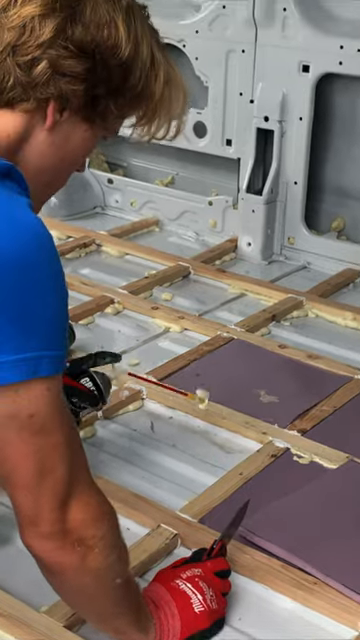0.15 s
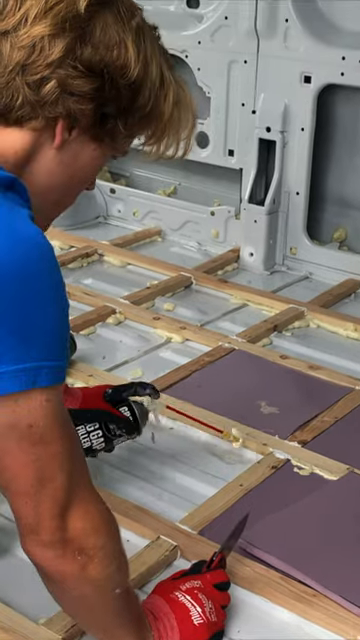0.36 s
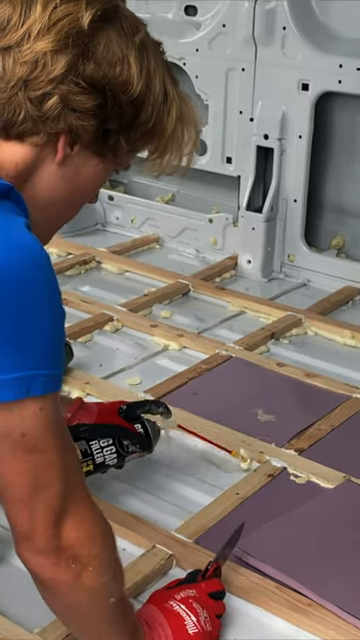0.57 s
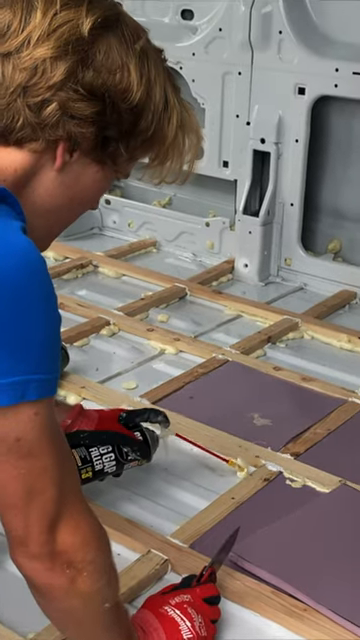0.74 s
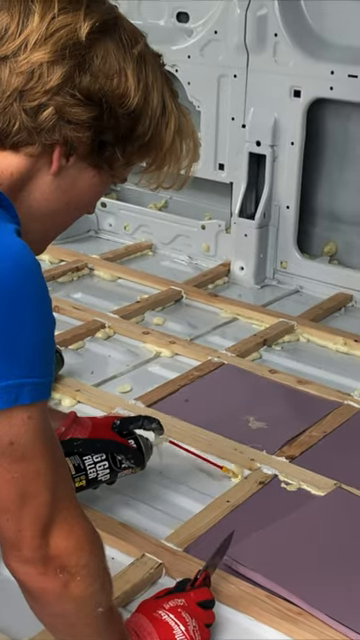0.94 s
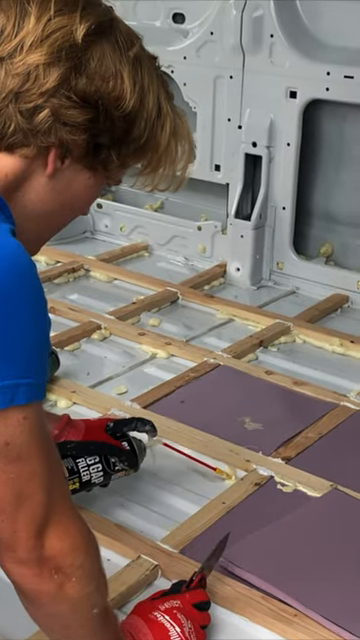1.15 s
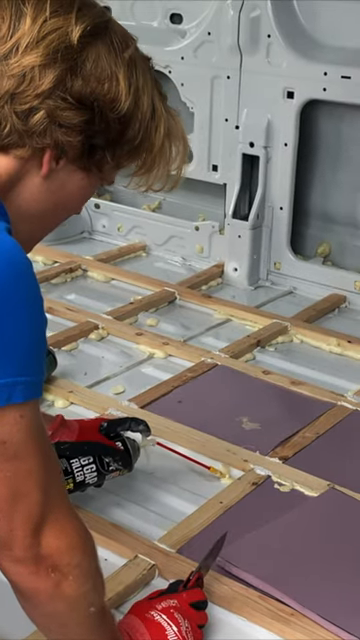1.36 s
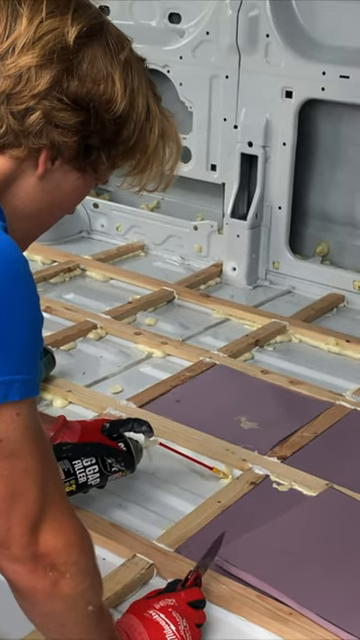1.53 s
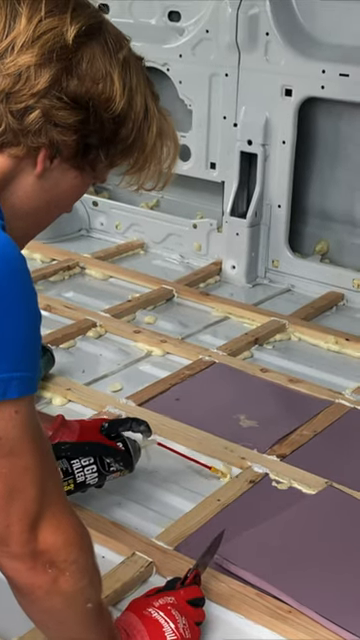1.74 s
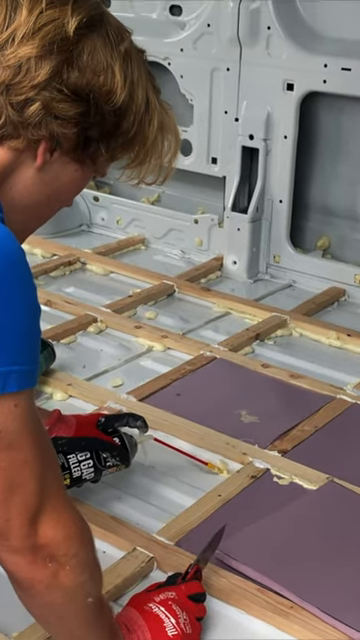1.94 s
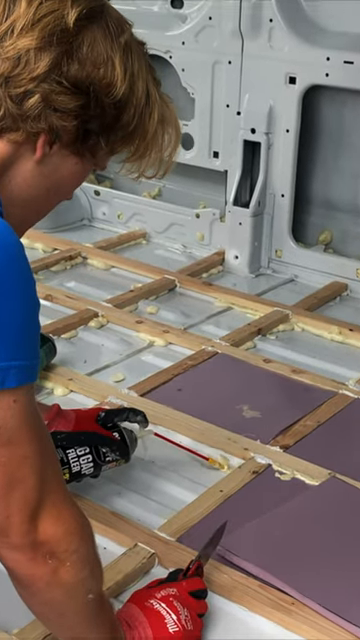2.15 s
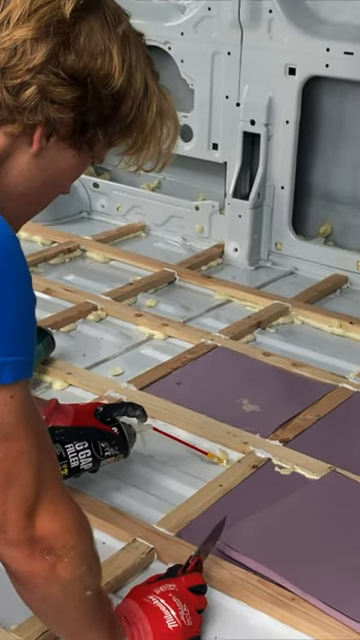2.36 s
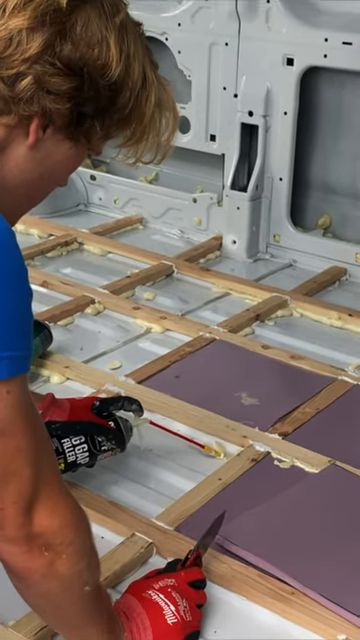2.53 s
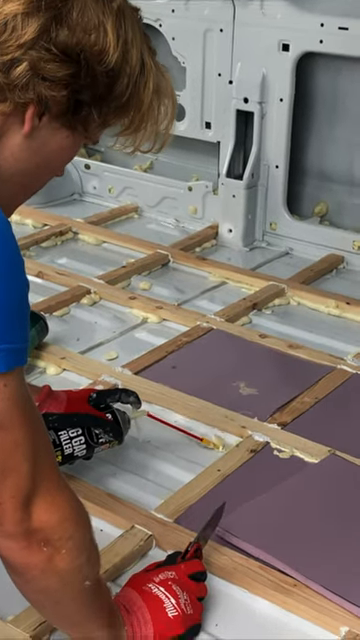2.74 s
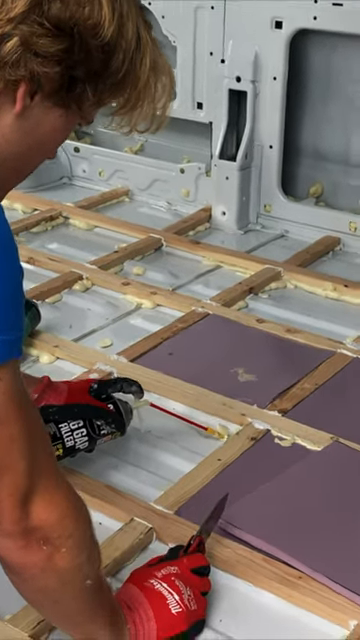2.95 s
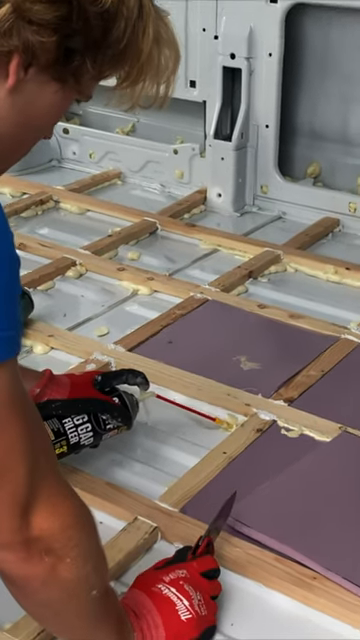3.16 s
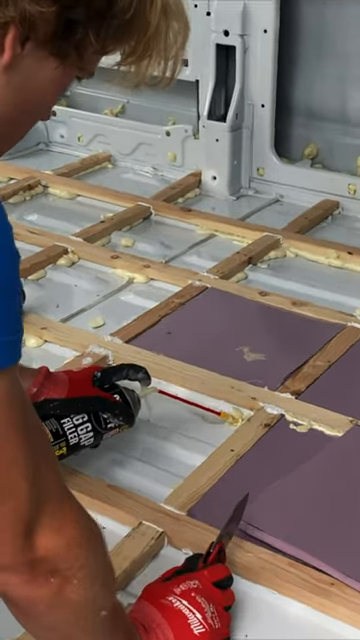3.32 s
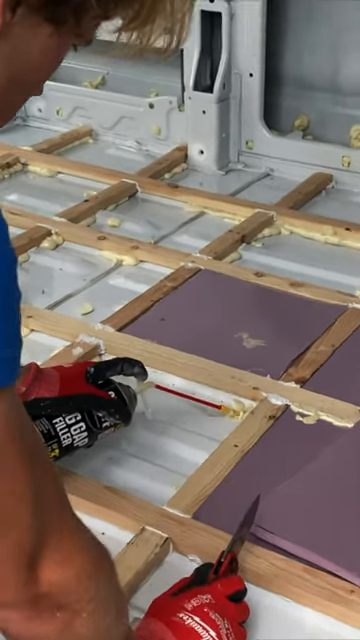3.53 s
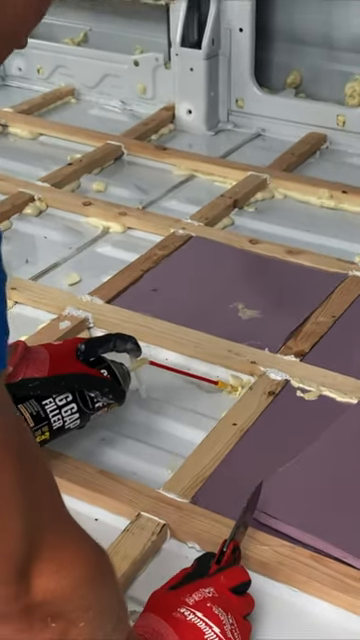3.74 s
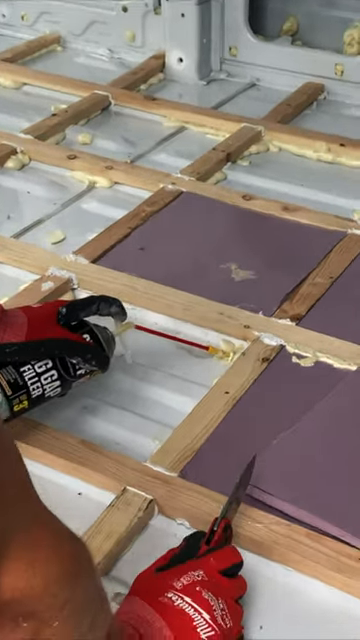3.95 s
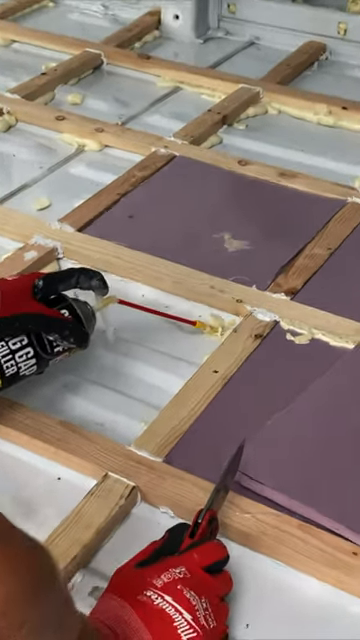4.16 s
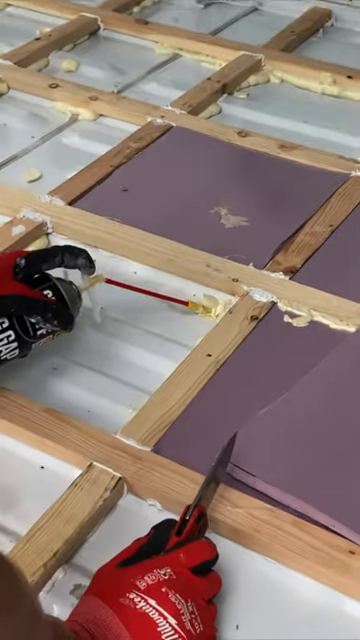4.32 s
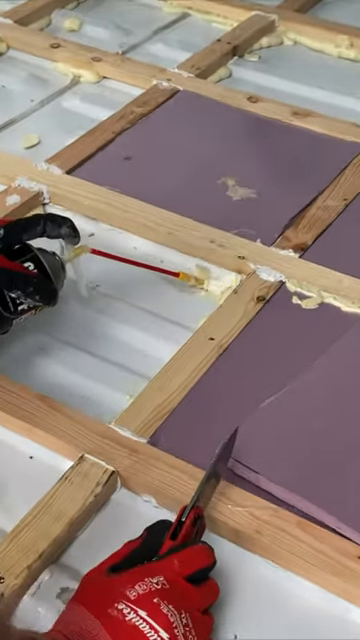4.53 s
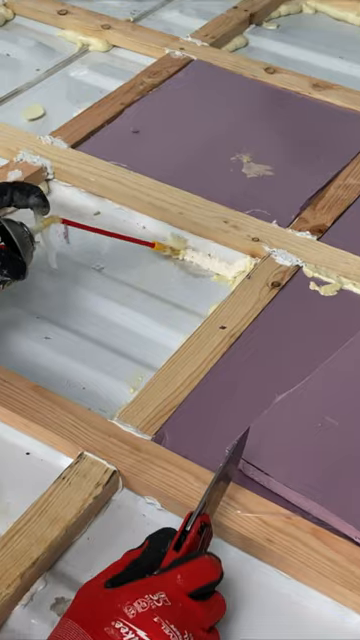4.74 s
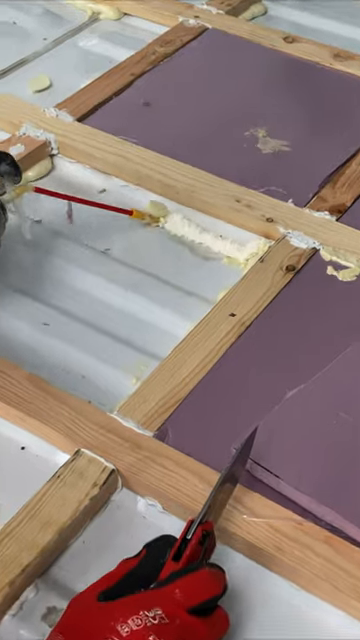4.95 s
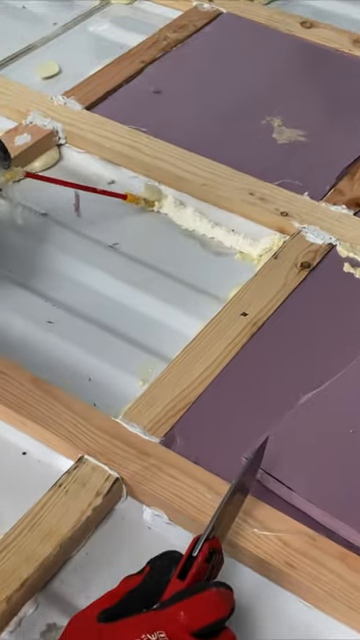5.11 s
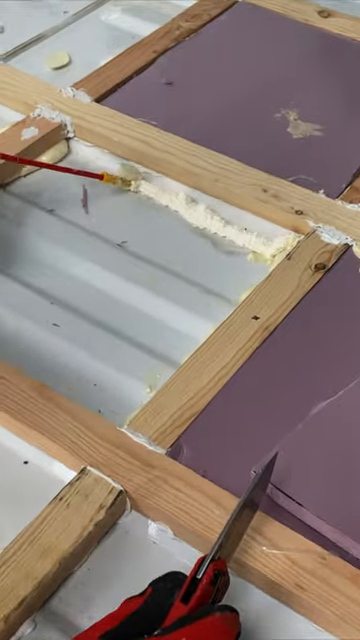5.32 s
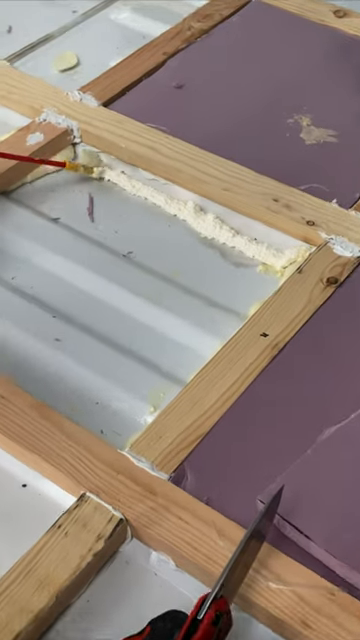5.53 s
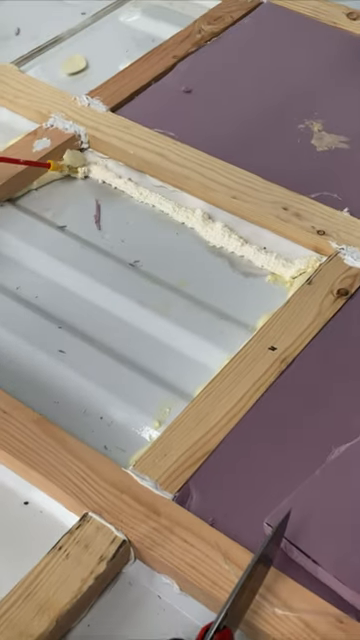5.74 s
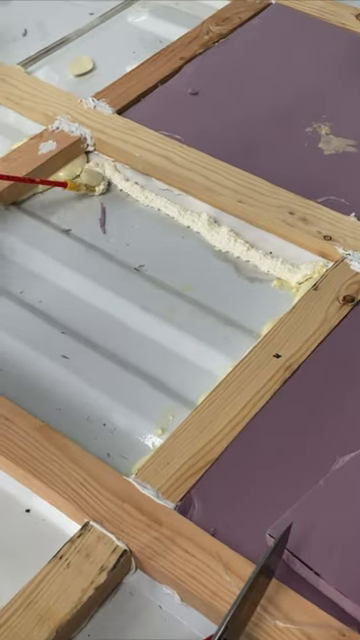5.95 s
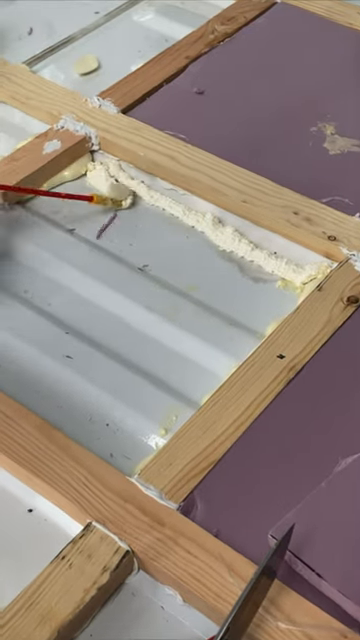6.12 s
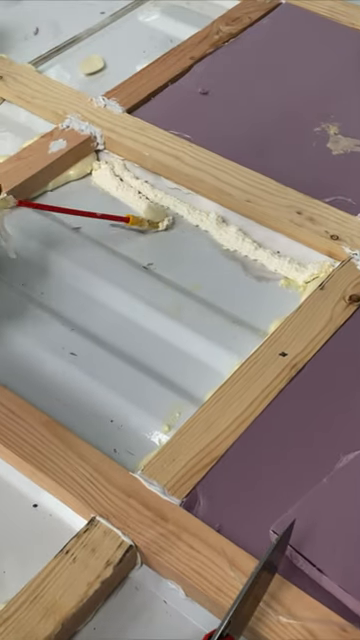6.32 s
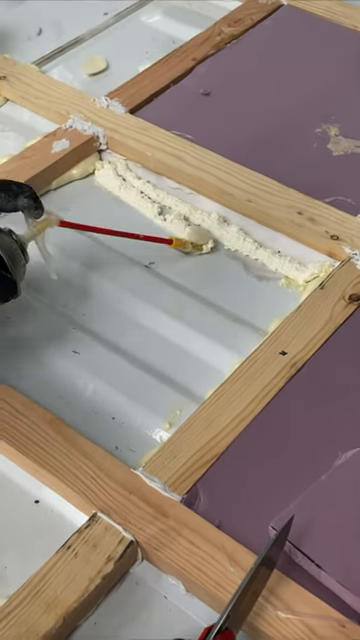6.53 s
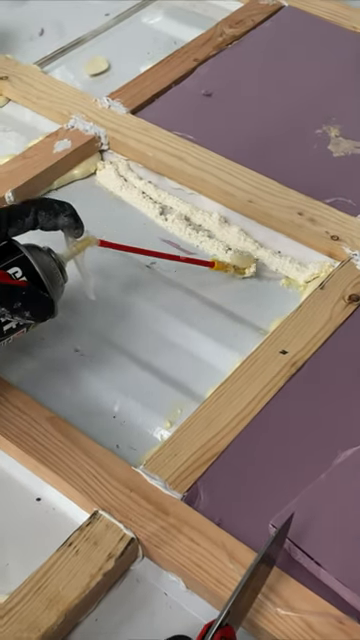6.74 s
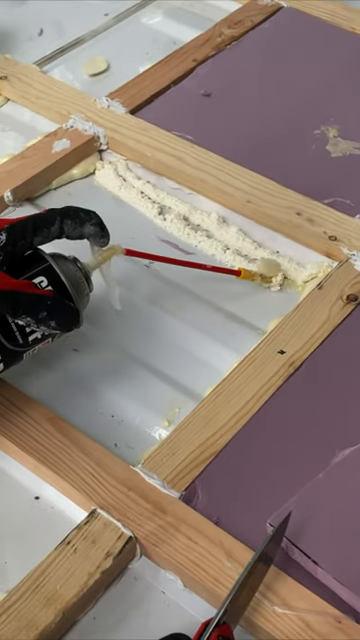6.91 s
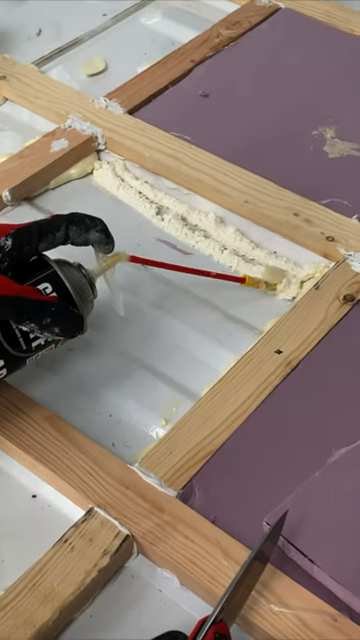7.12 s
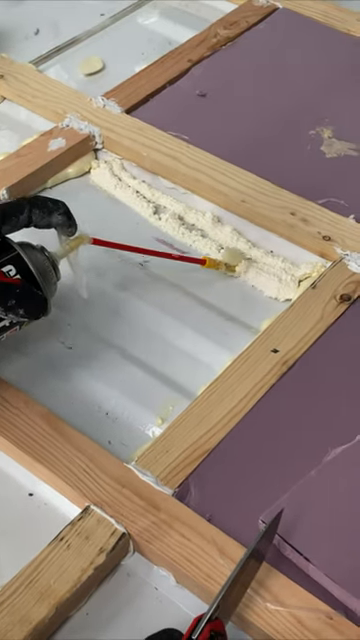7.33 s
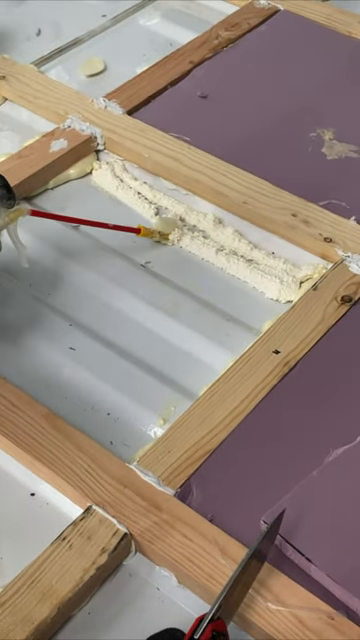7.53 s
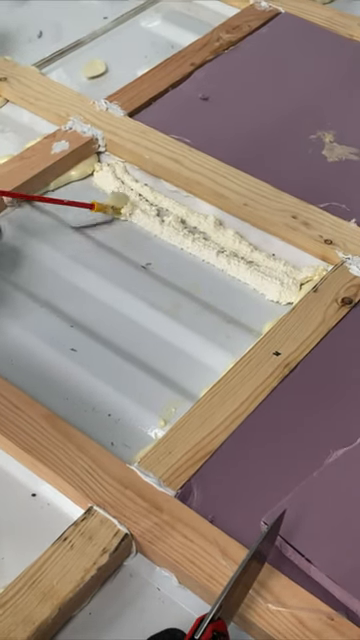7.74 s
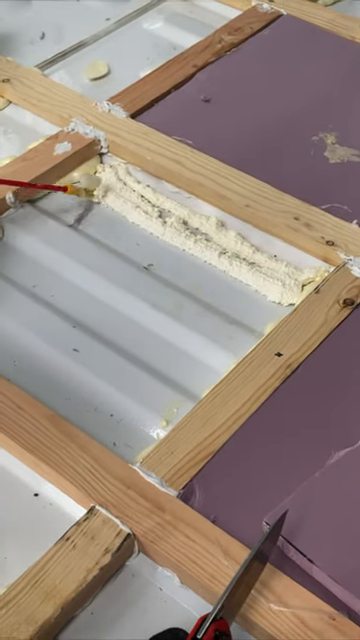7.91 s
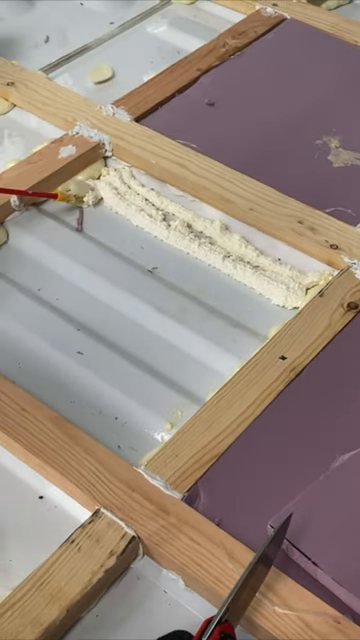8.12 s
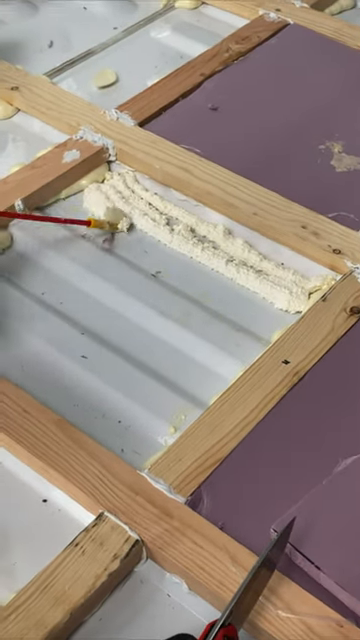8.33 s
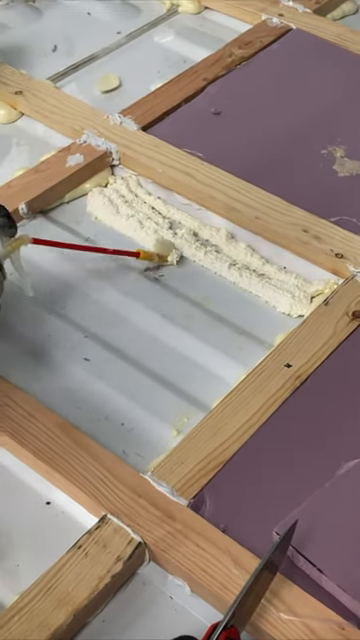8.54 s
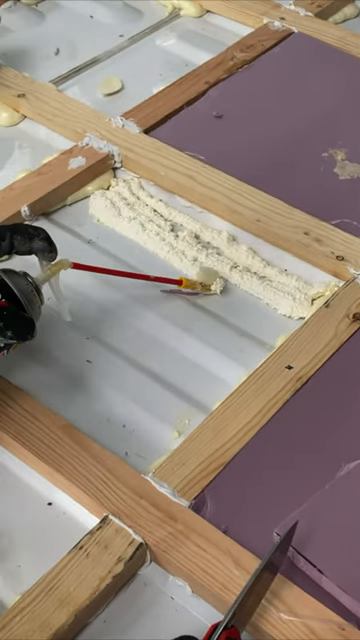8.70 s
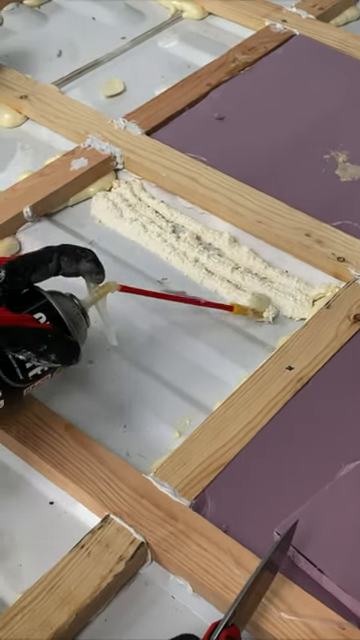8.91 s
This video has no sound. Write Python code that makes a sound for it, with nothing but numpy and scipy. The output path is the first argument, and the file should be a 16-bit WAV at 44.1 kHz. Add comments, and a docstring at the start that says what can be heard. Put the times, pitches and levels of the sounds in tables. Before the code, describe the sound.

Quiet yard with hoarse barks and birds, then aerosol foam starts thinly, spits in pops, and swells into a wet, crackling hiss.

```python
"""Foam can in an empty van

Expanding foam hisses, gurgles and sputters out of a thin straw: moving bands of noise, shaken and pinched,
with decaying pops for the slugs and shaky tones for the squeals. The straw moves about in an empty steel van,
close to a two-port microphone, so its echoes keep changing; a few knocks excite the modes of floor battens.
Outside, a dog barks in hoarse gliding partials and birds whistle, over filtered noise for rumble and wash."""
import sys
import numpy as np
from scipy import signal
from scipy.fft import rfft, irfft, next_fast_len
from scipy.io import wavfile
from scipy.ndimage import uniform_filter1d, map_coordinates

SR = 44100
rng = np.random.default_rng(int(sys.argv[2]) if len(sys.argv) > 2 else 0)


def ratio(d):
    """dB to gain"""
    e = np.asarray(d, float) / 20
    return 10 ** e


def output_pcm(signal):
    """Save a mono or channel-first signal as 16-bit PCM at the path in sys.argv[1].

    Samples are clipped to [-1, 1] before scaling.
    """
    pcm = np.clip(np.atleast_2d(signal).T, -1, 1) * 32767
    wavfile.write(sys.argv[1], SR, np.round(pcm).astype(np.int16))


N = 395577

# Levels in the tables are relative: each source is trimmed where it is mixed.
# share of liquid foam in the flow: [t/s, wetness 0-1]
WETNESS = [(.9, 0.37), (1.3, 0.53), (2.25, 0), (2.55, 0.85), (3.5, 0.72), (4.1, 0.91), (5.6, 0.88),
           (6.3, 0.88), (7.3, 0.85), (8.3, 0.86), (8.97, 0.92)]
# foam leaving the mouth: [t/s, gurgle level/dB, gurgle centre f/Hz]
FOAM = [(0.86, -80, 2110), (0.9, -63, 1660), (0.95, -38, 1820), (1.06, -69, 2060), (1.17, -37.5, 1080),
        (1.38, -51, 2180), (2.1, -49, 2000), (2.26, -42.5, 2090), (2.5, -44, 2050), (2.69, -37.5, 1970),
        (2.91, -56.5, 1950), (3.05, -51, 1990), (3.23, -64, 1120), (3.48, -90, 1430), (3.55, -55, 1080),
        (3.61, -74, 1540), (3.66, -48.5, 1820), (3.89, -47.5, 1620), (3.95, -47, 1900), (4.08, -40.5, 1900),
        (4.095, -36.5, 1980), (4.19, -28.5, 1950), (4.22, -31, 2000), (4.36, -26.5, 2200),
        (4.49, -26.5, 2180), (4.6, -29, 1650), (4.7, -33.5, 1570), (4.9, -25, 1900), (5.44, -31.5, 1490),
        (5.6, -26, 1830), (5.77, -24, 2000), (5.85, -25.5, 1950), (5.95, -27.5, 1550), (6.08, -28, 1520),
        (6.35, -36.5, 1590), (6.44, -32.5, 1700), (6.94, -37.5, 1150), (7.03, -38.5, 1390),
        (7.34, -35.5, 1330), (7.46, -34, 1620), (7.66, -36, 1420), (7.75, -28.5, 1580), (7.79, -34, 1290),
        (8.18, -35.5, 1720), (8.29, -32.5, 1020), (8.45, -41.5, 1600), (8.95, -40.5, 1560),
        (8.97, -44, 1720)]
# gas escaping past it: [t/s, low whistle level/dB, high whistle over low/dB, fizz over low/dB]
GAS = [(0.86, -64, -6, -9), (0.95, -42.5, -2, -0.5), (1.27, -49, 2.5, 1), (1.72, -36.5, 2, 5),
       (1.9, -39.5, 4, 2), (2.16, -35, 7.5, 3), (2.2, -38, 6.5, 2.5), (2.28, -37, 4, 1.5),
       (2.71, -36, 0.5, -13), (2.87, -45, 0, -10.5), (3.03, -40.5, 2.5, -7), (3.3, -57.5, -3.5, -6),
       (3.77, -49.5, 5.5, 9), (4.07, -55, -10, -3), (4.14, -55.5, -6, 13), (4.19, -36, 4, 6.5),
       (4.215, -51, 9, 14), (4.23, -36, 6.5, 0.5), (4.34, -32.5, -1, -15), (4.41, -32, -3.5, -16),
       (4.49, -30.5, 0, -10), (4.58, -42.5, 3, -25), (4.64, -39, -7, 5.5), (4.69, -43.5, 4, -9),
       (4.9, -29, -1, -4.5), (5.31, -28.5, 0, -10), (5.42, -32.5, -3, -10), (5.47, -33, 9.5, 0.5),
       (5.6, -28.5, 0.5, -2.5), (5.74, -25, 1.5, -7.5), (5.83, -34, -1.5, -10), (5.89, -28.5, -14, -27),
       (5.94, -29.5, -21, -25), (6.05, -28, 5.5, -7.5), (6.12, -23.5, -3.5, -22), (6.14, -27, 4, -12),
       (6.35, -31.5, 0, -22), (6.42, -39, -12, -14), (6.48, -31, -16, -7), (6.55, -29.5, -13.5, -21.5),
       (6.69, -35, -9, -18), (6.87, -39.5, -8, -11.5), (6.95, -36.5, -1, -20), (7.02, -41, -22, -18.5),
       (7.2, -54, -13, -12), (7.25, -43, -3.5, -13), (7.36, -39.5, -1, -3), (7.41, -32.5, 1, -7),
       (7.84, -28.5, -0.5, -9.5), (7.91, -25, -6, -17), (8.02, -39, 7.5, 4.5), (8.09, -35.5, -13, -12),
       (8.16, -58, 0, -9), (8.27, -42, 3.5, -8), (8.31, -26.5, 3, -11.5), (8.45, -32, 8.5, -9),
       (8.81, -36, -6.5, -7.5), (8.9, -33, -5.5, -18), (8.97, -43, -2, -8)]
# the rasp between gurgle and whistles: [t/s, level/dB, centre f/Hz]
RASP = [(0.86, -73, 2480), (0.9, -39, 2550), (0.95, -36, 2920), (1.04, -40, 3170), (1.15, -44.5, 2780),
        (1.24, -41, 3230), (2.26, -40.5, 3200), (2.71, -49.5, 3420), (2.87, -66, 3050), (3.03, -48.5, 3180),
        (3.34, -59, 2920), (3.77, -48.5, 2820), (4.07, -51, 2550), (4.25, -34, 3000), (4.5, -29, 3100),
        (4.61, -39, 2700), (4.77, -31.5, 2830), (5.02, -25.5, 2660), (5.35, -32.5, 2850), (5.72, -28, 2770),
        (5.76, -26.5, 3270), (6.01, -34.5, 3000), (6.14, -33, 3630), (6.46, -44, 3500), (6.55, -40, 3730),
        (6.8, -32.5, 3900), (6.96, -37.5, 3300), (7.25, -51.5, 2900), (7.34, -45, 3120),
        (7.59, -39.5, 2680), (7.66, -27.5, 3140), (7.88, -46, 3230), (8.02, -26.5, 3030), (8.2, -46, 2710),
        (8.29, -42, 3300), (8.36, -35.5, 3080), (8.45, -39.5, 2640), (8.61, -50, 3580), (8.7, -43, 2970),
        (8.83, -37, 3200), (8.97, -43.5, 2870)]
# colour of the gurgle before its resonances: [f/Hz, level/dB]
GURGLE = [(250, -52), (550, 8.5), (750, 0), (1500, -10.5), (2300, -9), (2800, -40), (3600, -35),
          (6000, -54)]
# fixed resonances around the low whistle, one broad and one narrow: [f/Hz, width/Hz, level/dB]
LOW_WHISTLE = [(4350, 4900, -9), (5790, 290, -4.5)]
# pitch of the low whistle: [t/s, f/Hz]
LOW_PITCH = [(0.9, 4220), (1.6, 4920), (2.2, 4520), (2.5, 4920), (2.79, 4660), (2.9, 5500), (3.52, 4200),
             (3.56, 5800), (3.68, 5900), (3.76, 3980), (3.9, 3800), (4.1, 4930), (4.47, 4270), (4.85, 5170),
             (5.39, 4700), (5.6, 5100), (5.89, 4730), (6.15, 4700), (6.5, 5150), (6.88, 5010), (6.97, 4370),
             (7.96, 5130), (8.56, 4760), (8.72, 5280), (8.97, 4300)]
# pitch of the high whistle: [t/s, f/Hz]
HIGH_PITCH = [(0.9, 6800), (1.17, 7240), (1.42, 6530), (1.62, 7000), (2.2, 7100), (2.88, 7100),
              (2.94, 6260), (3.03, 7400), (3.39, 6600), (3.6, 8100), (3.87, 6950), (4.09, 7400),
              (4.2, 7000), (4.72, 6900), (4.76, 7600), (5.28, 6770), (5.57, 7130), (5.62, 6760),
              (6.41, 6600), (6.45, 7160), (6.99, 6860), (8.47, 6790), (8.97, 6700)]
# colour of the fizz: [f/Hz, level/dB]
FIZZ = [(5000, -39), (7500, 4.5), (8500, 8), (10300, -2), (11500, -11.5), (12500, -20), (13500, -60),
        (15000, 1), (16000, -53)]
# shallow dips in the straw's sound: [f/Hz, width/Hz, share lost]
DIPS = [(2650, 470, 0.24), (3685, 330, 0.21)]
# thick foam throttles the flow, which bursts free; negative depth swells it:
# [release t/s, depth/dB, closing time constant/s]
PINCHES = [(4.209, 22, 0.011), (4.279, -2, 0.011), (4.348, -1.5, 0.0093), (4.527, 13, 0.0088),
           (4.569, 1, 0.016), (4.621, 14, 0.031), (4.666, 6.5, 0.029), (4.727, -1, 0.013),
           (5.207, 8.5, 0.024), (5.262, 15, 0.0081), (5.305, 1.5, 0.011), (5.882, -1.5, 0.007),
           (5.957, 18, 0.002), (6.216, 7, 0.0082), (6.271, 10, 0.0097), (6.839, 5, 0.093),
           (8.393, -0.5, 0.0091), (8.521, 2, 0.004)]
# the mouth flaps open and shut: [first swell t/s, last swell t/s, swells per s, depth/dB]
FLUTTERS = [(6.455, 6.685, 31.5, 6), (6.927, 6.953, 45, 11), (5.312, 5.373, 37, 3), (6.11, 6.155, 42.3, 5),
            (8.428, 8.5, 31, 7.5), (8.597, 8.632, 31, 6.5)]
# squeals of gas through a gap in the foam: [start t/s, length/s, f/Hz, level/dB]
SQUEALS = [(0.929, .014, 2844, -35.5), (0.951, 0.013, 2900, -40), (3.554, 0.0097, 5800, -41),
           (3.803, 0.046, 6770, -43), (4.098, 0.0098, 4900, -44), (3.175, 0.021, 7000, -43),
           (3.218, 0.0098, 7000, -40.5), (5.208, 0.038, 5860, -33), (6.744, 0.049, 5200, -48),
           (6.837, 0.023, 5220, -32), (6.926, 0.015, 5820, -24.5)]
# the clearest slugs of foam clearing the straw: [t/s, level/dB, hiss against pop/dB, pop f/Hz]
SPURTS = [(0.934, -26.5, -4.5, 1350), (0.959, -31, -14.5, 1190), (1.033, -43, 6, 2030),
          (1.36, -34, 2, 2130), (2.297, -20.5, 3, 1900), (2.466, -23.5, 2, 1970), (2.526, -26, -13, 1940),
          (3.21, -21.5, -26, 970), (3.223, -35, -6, 1090), (3.37, -33.5, 2, 1210), (3.54, -21, -5, 1080),
          (3.656, -25.5, -13, 1980), (3.733, -26.5, -1, 2020), (3.757, -28.5, 0, 980),
          (3.818, -28.5, -7, 2140), (3.859, -29.5, 3, 1870), (3.991, -24, -24, 1900),
          (4.008, -27, -17, 1900), (4.066, -47, 8, 1890), (4.09, -26, -6, 2000), (4.123, -28, -15, 1900),
          (4.182, -42, 9, 1950), (4.21, -28.5, 7.5, 2100), (4.278, -28, 6, 2020), (4.354, -19, -6, 2130),
          (4.529, -19, 0.5, 1450), (4.571, -18, -5, 1980), (4.622, -21.5, -9, 2120),
          (4.675, -19.5, 0, 2000), (4.728, -17, 0.5, 1350), (4.76, -18, 1, 2000), (4.782, -18, -5, 1970),
          (4.824, -17.5, -0.5, 1900), (4.853, -18, -22, 1740), (5.208, -18, -8, 2470),
          (5.27, -28, 10, 1810), (5.936, -15, -22, 1550), (6.083, -15.5, -14, 1420),
          (6.219, -20.5, 4.5, 1450), (6.577, -22, -9, 1490), (6.64, -22.5, -2, 1630),
          (7.209, -30, -25, 1260), (7.224, -20.5, -18, 1270), (7.232, -27, -20, 1330),
          (7.241, -23, -17, 1500), (7.323, -23, -12, 1417), (7.4, -32, 12, 1190), (7.768, -28, 19.5, 1050),
          (8.246, -24, -19, 1140), (8.397, -25, 18, 1030), (8.524, -34, 19.5, 1544)]
# blows on the battens: [t/s, level/dB, crack against thud/dB, hardness of contact f/Hz]
KNOCKS = [(0.083, -28.5, 2.5, 1480), (4.794, -27, -16, 700), (4.909, -30.5, 0, 1810),
          (5.488, -27.5, -5, 170)]
# modes of a batten: [f/Hz, width/Hz, level/dB]
BATTEN = [(175, 160, -8), (403, 85, 5.5), (690, 370, 0.5), (1350, 160, -3.5)]
# where the straw is heard: [t/s, left over right level/dB]
PLACE = [(0.0, 11.5), (0.1, 3), (0.22, 8), (0.27, 2), (0.62, 1), (2.05, 1), (6.12, 2.5), (6.75, 0),
         (8.09, 2.5), (8.97, 1)]
# the housing turns the phase between the ports: [f/Hz, right leads left by/rad]
PORT_PHASE = [(300, 0), (1000, .7), (2000, -.3), (2700, 0), (3500, -3), (3900, -2.9), (4400, -1.1),
              (5700, 1.9), (6200, 1.8), (7000, -1), (7500, -1.3), (7900, -3.6), (8600, -3.1), (9600, -1.8),
              (10600, 0), (11700, 0), (12500, 2.3)]
# echo decay in the van: [f/Hz, t60/s]
VAN = [(300, 0.12), (2000, 0.11), (7000, 0.046), (10000, 0.014)]
# [start t/s, rise/s, level/dB, lower partial f/Hz, upper partial f/Hz, upper over lower/dB,
#  hoarseness: scale of phase shake/rad]
BARKS = [(-.03, 0.025, -42, 497, 803, 3.5, 1.1), (.2, 0.081, -32, 521.4, 801, 5, 0.71),
         (1.071, 0.1, -26, 597, 845, -3, 1.2)]
# whistled notes: [start t/s, hold/s, fade/s, f/Hz, glide/(Hz/s), level/dB, scale of phase shake/rad]
BIRDS = [(-.02, 0.14, 0.29, 3090, -400, -52, 2.6), (0.132, .08, 0.025, 2272, -150, -45.5, 0.35),
         (0.48, 0.097, 0.36, 2784, 66, -49, 1.18), (0.528, 0.018, 0.023, 2650, -14000, -46, .15),
         (0.872, 0.076, 0.015, 2394, 1900, -44.5, 0.091), (0.919, .18, 0.1, 2530, 393, -48.5, 0.17),
         (0.034, 0.031, 0.025, 3350, -6000, -40.5, 0.48), (0.617, 0.05, 0.03, 4780, 10, -74, 0.34),
         (0.708, 0.056, 0.084, 4700, -500, -71, 1.5)]
# echo decay in the yard: [f/Hz, t60/s]
YARD = [(400, 0.54), (2300, 0.34), (3300, 0.25), (8000, 0.17)]
# colour of the far rumble: [f/Hz, level/dB]
RUMBLE = [(15, -31), (40, -0.5), (100, 2.5), (160, 6.5), (300, -29.5)]
# rumble over time: [t/s, level/dB]
RUMBLE_LEVEL = [(0, -65.5), (1.2, -62), (2.8, -60), (3.9, -59.5), (4.4, -70.5), (6.4, -72.5), (7.4, -60.5),
                (8.97, -65)]
# colour of the wash from outside: [f/Hz, level/dB]
AIR = [(60, -45), (120, -13), (200, -3), (300, 0), (600, -2.5), (1000, 1.5), (2000, -11), (3300, -11),
       (3900, -20), (7000, -30), (10000, -57), (14000, -83)]
# wash over time: [t/s, level/dB]
AIR_LEVEL = [(0.0, -60.5), (0.82, -71), (1.2, -55.5), (1.57, -68), (2.65, -65), (4.77, -58), (5.4, -69),
             (5.67, -56.5), (8.97, -56)]
# how alike rumble and wash are at the two ports: [f/Hz, left-right likeness]
AIR_ALIKE = [(60, 0.93), (300, 0.8), (800, 0.1), (3000, 0.077)]

VALVE_S, OPENING_S = 0.885, 0.025  # the trigger is pressed; the flow fades in
# small gas pockets: average rate, decay time constant, relative size
SPUTTERS_PER_S, SPUTTER_S, SPUTTER_SIZE = 90, 0.0027, 0.38
RELEASE_S = 0.00051  # time constant of reopening after a pinch
FLUTTER_LIFT = 0.6  # share of the depth by which the swells rise above the steady flow
# lesser slugs: candidates per s (thinned in dry flow), offset from gurgle, scatter, hiss against pop
SPITS_PER_S, SPIT_DB, SPIT_SCATTER_DB, SPIT_HISS_DB = 5, 4, 2, -12
PUFF_T60_S, PUFF_LONGER = 0.053, 0.94  # t60 at 1.6 kHz; power by which it grows with the pop's pitch
# bark swell, speed of fall, depth of fade; the pitch starts this share low
BARK_RISE_DB, BARK_FALL_DB_PER_S, BARK_FADE_DB, BARK_SAG = 22, 122, 48, 0.0436
NOTE_RISE_S, NOTE_RISE_DB, NOTE_FADE_DB = 0.018, 13, 27.5


def unit(x):
    """x at rms 1."""
    return x / np.sqrt(np.mean(x ** 2) + 1e-20)


def along(points, hz):
    """(Hz, value) points on a log axis."""
    f, v = np.transpose(points)
    return np.interp(np.log(hz + 1), np.log(f + 1), v)


def curves(rows, t):
    """The columns after the time, read at times t."""
    s, *cols = np.transpose(rows)
    return [np.interp(t, s, c) for c in cols]


def wobble(rate, count=N):
    """A smooth random curve, rate knots a second (at most 1000)."""
    knots = rng.standard_normal(count // 40 + 8)
    return map_coordinates(knots, [np.arange(count) * min(rate, 1000) / SR])


def filtered(x, response):
    """x times a complex response of frequency."""
    m = next_fast_len(x.shape[-1] + 8192)
    return irfft(rfft(x, m) * response(np.fft.rfftfreq(m, 1 / SR)), m)[..., :x.shape[-1]]


def resonances(modes, f):
    """Causal response of (Hz, width, dB) modes of alternating sign."""
    return sum((-1) ** k * ratio(db) * 1j * f * w / (c * c - f * f + 1j * f * w)
               for k, (c, w, db) in enumerate(modes))


def turbulence(colour, patchy_db, grainy_db):
    """Noise of rms 1 with random patches and fast grain; colour(Hz, s) may move."""
    grain_db = grainy_db * 1.66 * np.tanh(wobble(400) / 1.4)
    noise = ratio(grain_db) * rng.standard_normal(N)
    f, t, z = signal.stft(noise, SR, nperseg=512)
    patches = uniform_filter1d(rng.standard_normal(z.shape), size=4, axis=0)
    patches = uniform_filter1d(patches, size=8, axis=1)
    gain = np.abs(colour(f[:, None], t[None])) * np.ones(z.shape)
    gain = gain * ratio(patchy_db * unit(patches))
    gain = gain / np.sqrt(np.mean(gain ** 2, axis=0))  # patches move colour about, not loudness
    return unit(signal.istft(z * gain, SR, nperseg=512)[1][:N])


def tone(rows, rough, rasp):
    """One gliding partial from first to last row, its phase and size shaken; at most a second long."""
    out, start = np.zeros(N), max(round(rows[0][0] * SR), 0)
    t = np.arange(start, min(start + SR, N)) / SR
    hz, db = curves(rows, t)
    gate = np.clip(np.minimum(t - rows[0][0], rows[-1][0] - t) / 0.0038, 0, 1)
    phase = 2 * np.pi * np.cumsum(hz) / SR + rough * wobble(rasp, count=len(t))
    size = np.sqrt(2) * ratio(db + 2.3 * rough * wobble(rasp, count=len(t)))
    out[start:start + len(t)] = size * gate * np.sin(phase)
    return out


def tail(decay):
    """Two unrelated echo tails of energy 1; each frequency dies at its own speed."""
    f, t, z = signal.stft(rng.standard_normal((2, SR // 2)), SR, nperseg=256)
    h = signal.istft(z * ratio(-60 * t / along(decay, f)[:, None]), SR, nperseg=256)[1]
    return h / np.linalg.norm(h, axis=1, keepdims=True)


def jet(slug_rows):
    """Foam gurgles in the straw's mouth as gas whistles and fizzes; wet foam is deeper and stutters more."""
    t = np.arange(N) / SR
    gurgle_db = curves(FOAM, t)[0]
    gas_db, high_db, fizz_db = curves(GAS, t)
    rasp_db = curves(RASP, t)[0]
    stutter = wobble(36)
    stutter = unit(stutter - uniform_filter1d(stutter, size=3000))
    stutter = 0.72 * np.tanh(stutter / 2.0) * (0.073 + curves(WETNESS, t)[0])

    def mouth(f, s):
        lowest_hz = 2050 - 1500 * np.clip(curves(WETNESS, s)[0], 0, 1)
        ring = np.abs(resonances([(1100, 350, -11), (curves(FOAM, s)[1], 450, 0)], f + 1))
        return ratio(along(GURGLE, f)) * (1 + 4.6 * ring) / (1 + (lowest_hz / (f + 1)) ** 9)

    def low(f, s):
        ring = resonances([LOW_WHISTLE[0], (curves(LOW_PITCH, s)[0], 280, 1.5), LOW_WHISTLE[1]], f + 1)
        return ring / (1 + (3500 / (f + 1)) ** 8) / (1 + (f / 6000) ** 8)

    def rasp(f, s):
        return resonances([(curves(RASP, s)[1], 1000, 0)], f + 1) ** 2

    def high(f, s):
        ring = resonances([(5900, 500, -6), (curves(HIGH_PITCH, s)[0], 500, 0)], f + 1)
        return ring / (1 + (5000 / (f + 1)) ** 6) / (1 + (f / 8200) ** 8)

    def fizz(f, s):
        return ratio(along(FIZZ, f))

    def straw(f):
        dips = 1 - sum(lost * np.exp(-((f - hz) / width) ** 2) for hz, width, lost in DIPS)
        return dips * f ** 4 / (f ** 4 + 300 ** 4)  # so thin a straw gives off no bass

    flow = ratio(gurgle_db - 4.0 + 0.76 * stutter) * turbulence(mouth, patchy_db=1.3, grainy_db=3.5)
    flow += ratio(gas_db - 1.0 + 0.17 * stutter) * turbulence(low, patchy_db=3.0, grainy_db=2.5)
    flow += ratio(rasp_db - 2.0 + 3.7 * stutter) * turbulence(rasp, patchy_db=1.5, grainy_db=3.5)
    flow += ratio(gas_db + high_db - 1.5 + 4.2 * stutter) * turbulence(high, patchy_db=2.5, grainy_db=1.5)
    flow += ratio(gas_db + fizz_db + 2.0 + 5.0 * stutter) * turbulence(fizz, patchy_db=2.0, grainy_db=2.0)
    flow = flow * sputter() * pinch() * flutter() * choke(slug_rows, depth_db=10.0, seconds=0.0037)
    valve = np.clip((t - VALVE_S) / OPENING_S, 0, 1)
    return filtered(flow * valve, straw)


def sputter():
    """Gas pockets burst through wet foam at random: sudden short swells of the whole flow."""
    t, kick = np.arange(N) / SR, np.arange(SR // 20) / SR
    draw = rng.random((2, N))
    size = -np.log(1 - 0.95 * draw[1]) * curves(WETNESS, t)[0]
    bursts = (draw[0] < SPUTTERS_PER_S / SR) * size
    return unit(1 + SPUTTER_SIZE * signal.fftconvolve(bursts, np.exp(-kick / SPUTTER_S))[:N])


def pinch():
    """Thick foam throttles the flow gradually, then lets it burst free almost at once."""
    t = np.arange(N) / SR
    return ratio(-sum(db * np.exp(-np.abs(t - s) / np.where(t < s, span, RELEASE_S))
                    for s, db, span in PINCHES))


def flutter():
    """The flapping mouth swells the flow regularly, with dips before, between and after the swells."""
    t, gain_db = np.arange(N) / SR, 0
    for s, end, rate, db in FLUTTERS:
        beat, last = (t - s) * rate, round((end - s) * rate)
        inside = np.clip(np.minimum(beat + 1, last + 1 - beat), 0, 1)
        dip = (np.cos(2 * np.pi * beat) - 1) / 2 * (inside > 0)
        gain_db = gain_db + db * (dip + FLUTTER_LIFT * inside)
    return ratio(gain_db)


def choke(slug_rows, depth_db, seconds):
    """The flow is pinched off for a moment while each slug blocks the straw."""
    t = np.arange(N) / SR
    s = np.transpose(slug_rows)[0]
    until = s[np.minimum(np.searchsorted(s, t), len(s) - 1)] - t  # time to the next slug
    return ratio(-depth_db * np.exp(-np.abs(until) / seconds) * (until >= 0))


def squeals():
    """Gas squeals through a gap in the foam: slightly shaky tones that swell and stop."""
    return sum(tone([(s, hz, db - 4), (s + span / 2, hz, db), (s + span, hz, db + 3)], rough=0.33, rasp=300)
               for s, span, hz, db in SQUEALS)


def slugs():
    """The clear slugs and random lesser ones, whose level and pitch follow the foam around them."""
    draw = rng.random((60, 4))
    s = FOAM[0][0] + np.cumsum(-np.log(1 - draw[:, 0]) / SPITS_PER_S)
    gurgle_db, hz = curves(FOAM, s)
    level_db = gurgle_db + SPIT_DB + SPIT_SCATTER_DB * (2 * draw[:, 1] - 1)
    hiss_db = SPIT_HISS_DB + 3 * SPIT_SCATTER_DB * (draw[:, 2] - 0.5)
    lesser = np.transpose([s, level_db, hiss_db, hz])
    kept = (s < N / SR) & (draw[:, 3] < curves(WETNESS, s)[0])  # wetter flow keeps more
    return sorted(SPURTS + [tuple(r) for r in lesser[kept]])


def spurts(slug_rows):
    """Each slug leaves with a short pop at the mouth's pitch and a puff of gas behind it."""
    out, t = np.zeros(N + SR), np.arange(SR // 8) / SR
    for s, db, hiss_db, hz in slug_rows:
        puff_t60 = PUFF_T60_S * (hz / 1600) ** PUFF_LONGER
        puff = rng.standard_normal((2, len(t))) * ratio(-60 * t / puff_t60)
        pop = np.sin(2 * np.pi * hz * t) * ratio(-60 * t / 0.011)
        wet = filtered(puff[0] * (1 - np.exp(-t / 0.0042)),
                       lambda f: resonances([(hz, 900, 0), (2600, 900, -6)], f))
        gas = filtered(puff[1] * (1 - np.exp(-t / 0.0045)),
                       lambda f: resonances([(4760, 4100, -1.5), (6950, 2000, 8.5), (8700, 4800, 0.0)], f))
        out[round(s * SR):][:len(t)] += ratio(db) * (1.62 * pop + 2.3 * wet + ratio(hiss_db + 6.0) * gas)
    band = lambda f: (1j * f / (1j * f + 380)) ** 4 / (1 + (f / 10500) ** 10)
    return filtered(out[:N], band)


def bubbles():
    """Tiny gas pockets burst at the mouth as random clicks that follow the foam's level and wetness."""
    t = np.arange(N) / SR
    hits = (rng.random(N) < 120 / SR) * rng.choice([-1, 1], N)  # 120 a second on average
    bursts = hits * ratio(13.0 * rng.exponential(size=N).clip(max=3))

    def spit(f):
        ring = resonances([(1900, 1000, 20.0), (5600, 4500, 8)], f)
        return ring * f ** 4 / (f ** 4 + 700 ** 4) / (1 + (f / 10500) ** 10)

    level = ratio(curves(FOAM, t)[0] - 12.5) * curves(WETNESS, t)[0]
    return level * unit(filtered(bursts, spit)) * (t > VALVE_S)


def knocks():
    """Blows on a wooden batten: a thud in its modes, duller for a soft contact, and a short crack."""
    thuds, cracks = np.zeros(N), np.zeros(N)
    t = np.arange(SR // 50) / SR
    for s, db, crack_db, top_hz in KNOCKS:
        push = t * np.exp(-2 * np.pi * top_hz * t)
        thuds[round(s * SR):][:len(t)] += ratio(db + 44.5) * push / push.sum()
        fall = ratio(db + crack_db + 19.0 - 60 * t / 0.0045)
        cracks[round(s * SR):][:len(t)] += fall * rng.standard_normal(len(t))
    snap = lambda f: resonances([(1370, 440, 6.6), (6200, 620, 3.8)], f) / (1 + (f / 9000) ** 6)
    return filtered(thuds, lambda f: resonances(BATTEN, f)) + filtered(cracks, snap)


def van(x, echo_db):
    """Each short stretch is heard from its own place, with fresh wall echoes."""
    hop = SR // 5
    out, padded = np.zeros((2, N + 2 * SR)), np.pad(x, (hop, 2 * hop))
    side = np.array([[0.5], [-0.5]])  # left, right
    for start in range(0, N + hop, hop):
        piece = padded[start:start + 2 * hop] * np.hanning(2 * hop + 1)[:-1]
        echoes = ratio(echo_db) * tail(VAN)[:, :hop]
        echoes[:, 0] = 1  # the direct sound
        heard = signal.fftconvolve(piece[None], echoes, axes=1)
        pan_db = curves(PLACE, (start / SR,))[0]
        ports = lambda f: ratio(side * pan_db) * np.exp(-1j * side * along(PORT_PHASE, f))
        heard = filtered(heard, ports)
        out[:, start:start + heard.shape[1]] += heard
    return out[:, hop:hop + N]


def dog():
    """Hoarse barks: two shaken partials that swell and fall."""
    def partial(s, rise, db, hz):
        fade_s = BARK_FADE_DB / BARK_FALL_DB_PER_S
        return [(s, hz * (1 - BARK_SAG), db - BARK_RISE_DB), (s + rise, hz, db),
                (s + rise + fade_s, hz, db - BARK_FADE_DB)]

    voice = sum(tone(partial(s, rise, db, low_hz), rough, rasp=190)
                + tone(partial(s, rise, db + up_db, up_hz), rough, rasp=150)
                for s, rise, db, low_hz, up_hz, up_db, rough in BARKS)
    # the strained throat adds sum and difference tones
    return voice + 0.71 * filtered(voice ** 2, lambda f: f ** 4 / (f ** 4 + 250 ** 4))


def birds():
    """Raspy whistles: single gliding tones with a quick rise, a hold and a fade."""
    def note(s, hold, fade, hz, glide, db):
        return [(s, hz, db - NOTE_RISE_DB), (s + NOTE_RISE_S, hz + glide * NOTE_RISE_S, db),
                (s + hold, hz + glide * hold, db),
                (s + hold + fade, hz + glide * (hold + fade), db - NOTE_FADE_DB)]

    return sum(tone(note(*row), rough, rasp=260) for *row, rough in BIRDS)


def outdoors():
    """Barks and whistles, each heard directly and blurred by the yard's echoes."""
    barks, whistles = dog(), birds()
    blur = lambda x: signal.fftconvolve(x[None], tail(YARD), axes=1)[:, :N]
    direct = np.array([barks, -0.3 * barks])  # the bark reaches the two ports out of step
    return ratio(6.0) * direct + ratio(-4.5) * blur(barks) + ratio(0.5) * whistles + ratio(3) * blur(whistles)


def air():
    """A far rumble and an outdoor wash that comes and goes."""
    t = np.arange(N) / SR
    flutter_db = 1.2 * wobble(7)
    rumble = ratio(curves(RUMBLE_LEVEL, t)[0] + 0.49 * wobble(3.35)) * wash(RUMBLE)
    return rumble + ratio(curves(AIR_LEVEL, t)[0] + 10.0 + flutter_db) * wash(AIR)


def wash(spectrum):
    """Stereo noise of rms 1, alike at both ports only in the bass."""
    turn = lambda f: np.arccos(np.clip(along(AIR_ALIKE, f), -1, 1)) / 2
    spread = lambda f: ratio(along(spectrum, f)) * [np.cos(turn(f)), np.sin(turn(f))]
    mid, side = filtered(rng.standard_normal((2, N)), spread)
    return unit(np.array([mid + side, mid - side]))


def scene():
    """Everything that reaches the two ports."""
    rows = slugs()
    stream = van(jet(rows) + squeals(), echo_db=2.0)
    bursts = van(spurts(rows) + bubbles(), echo_db=-4)
    return stream + bursts + van(knocks(), echo_db=-13.0) + outdoors() + air()


def low_pass(x):
    """Removes everything above the highest recorded frequency."""
    return signal.sosfilt(signal.butter(12, 16470, fs=SR, output="sos"), x)


def record(dry):
    """The microphone drops the deep bass."""
    mix = filtered(dry, lambda f: (1j * f / (1j * f + 90)) ** 2)
    return low_pass(mix)


dry = scene()
out = record(dry)
output_pcm(out)
```